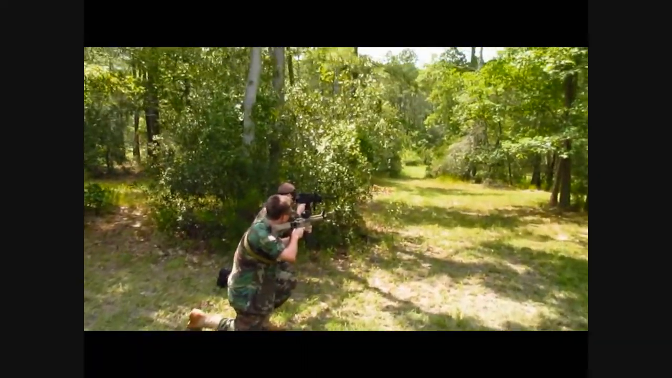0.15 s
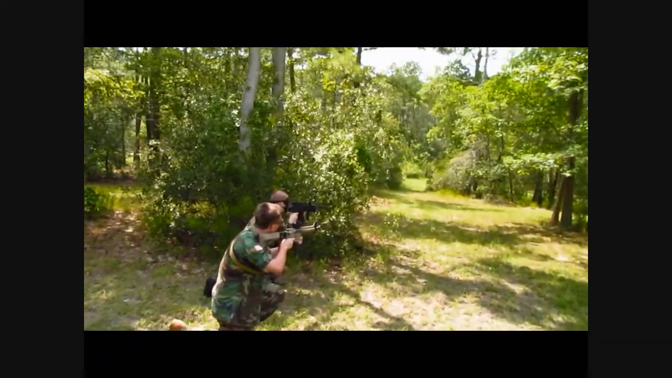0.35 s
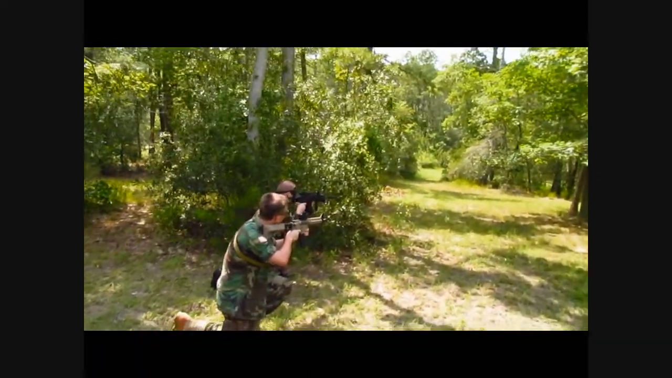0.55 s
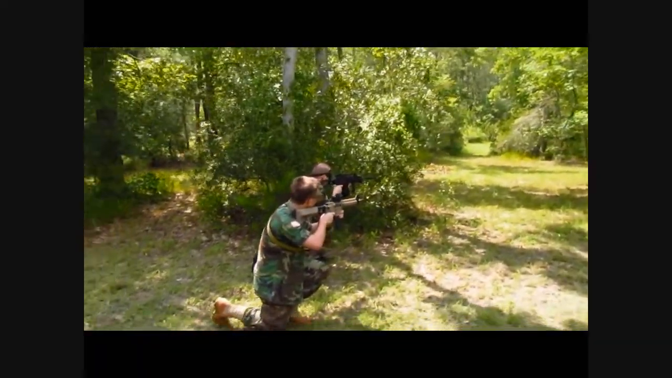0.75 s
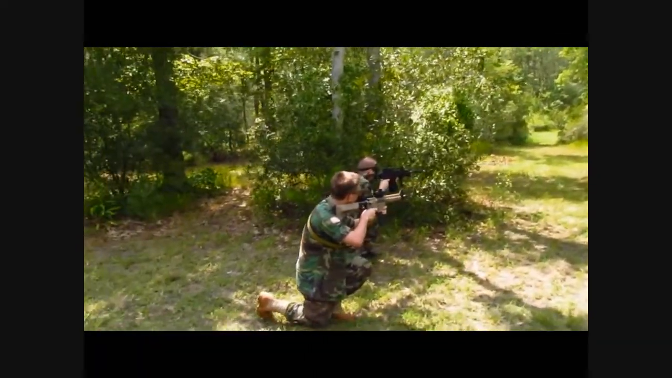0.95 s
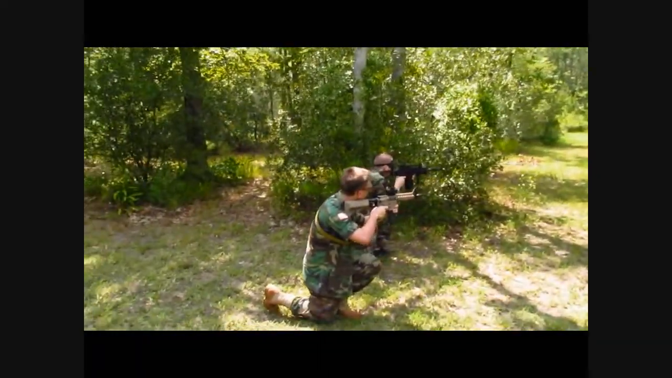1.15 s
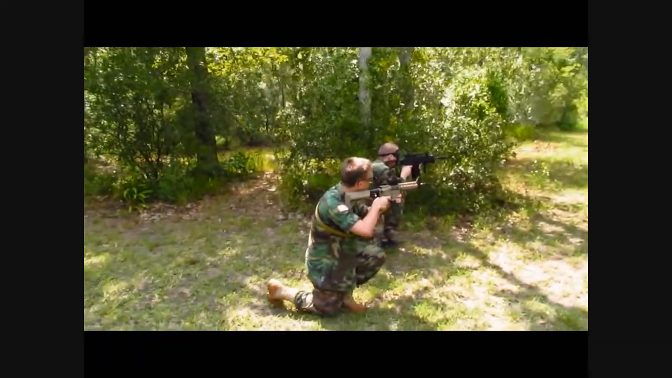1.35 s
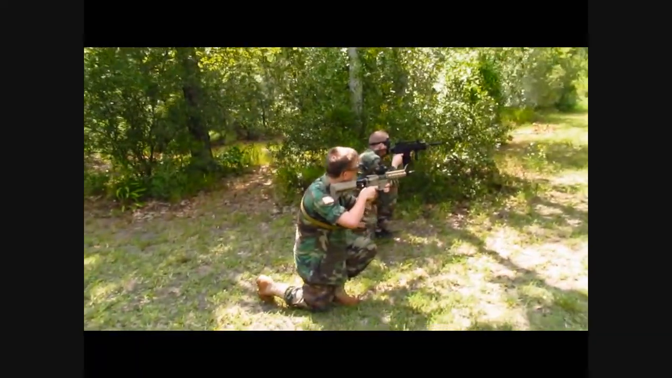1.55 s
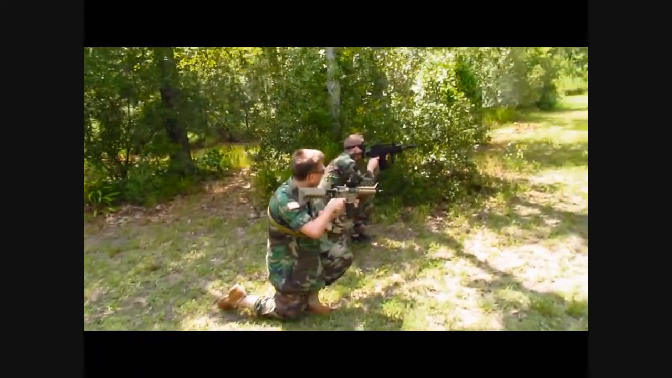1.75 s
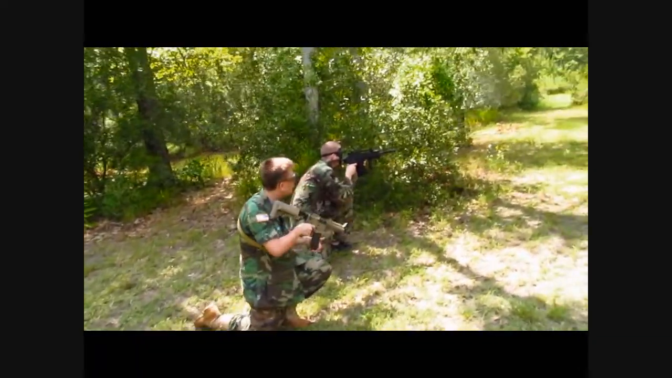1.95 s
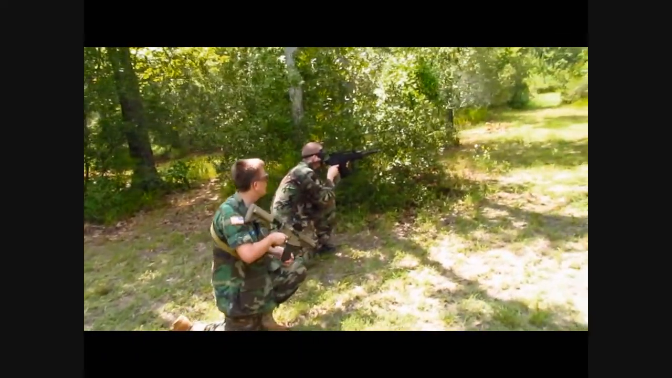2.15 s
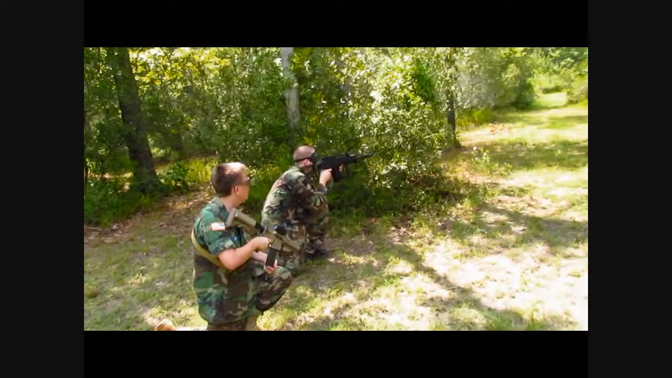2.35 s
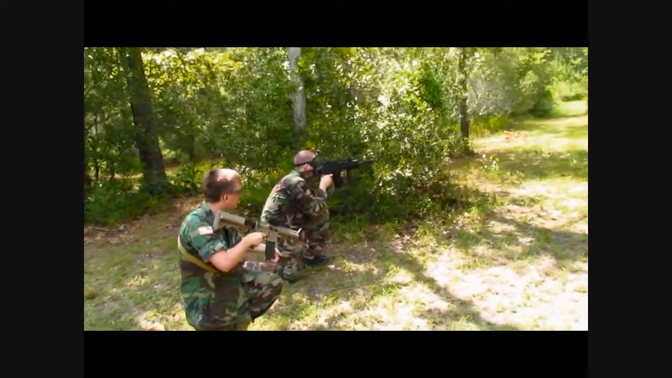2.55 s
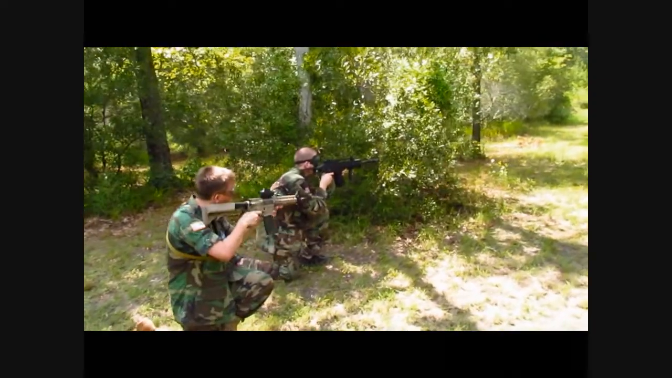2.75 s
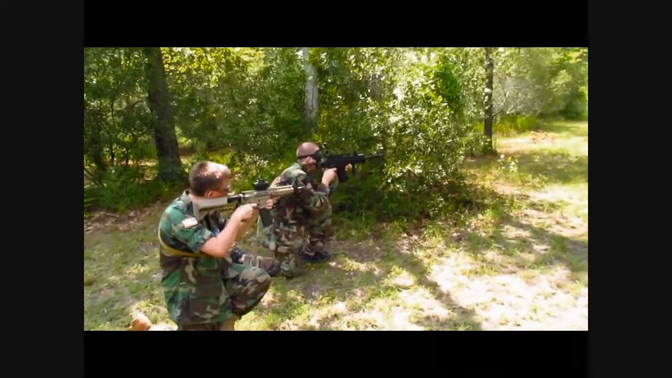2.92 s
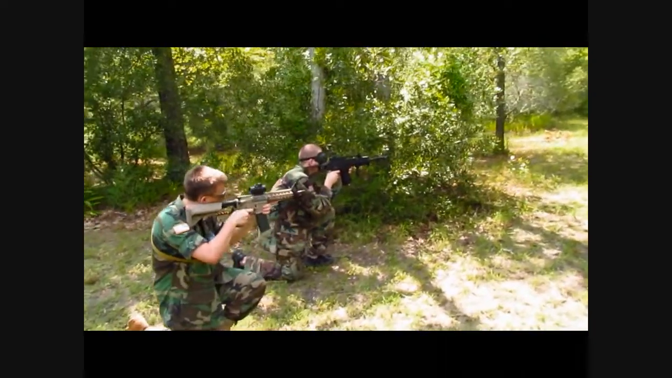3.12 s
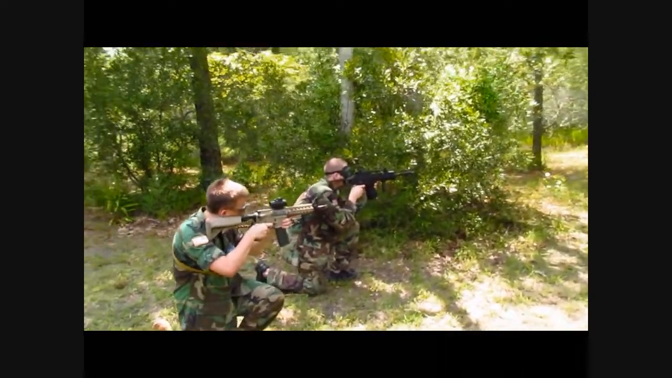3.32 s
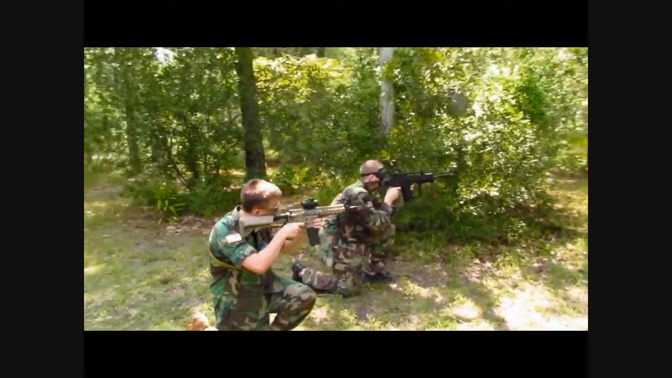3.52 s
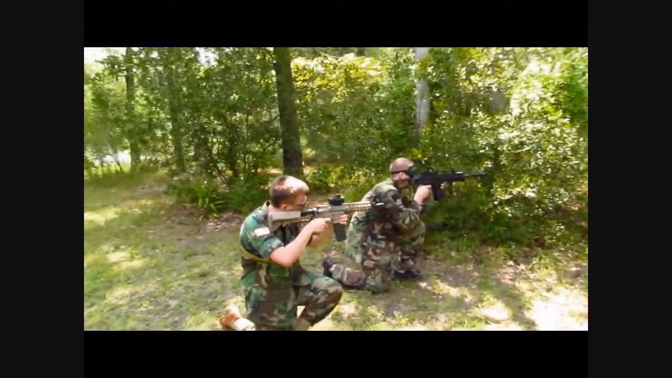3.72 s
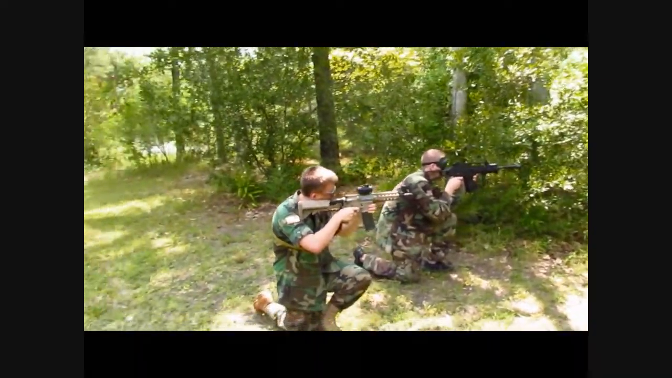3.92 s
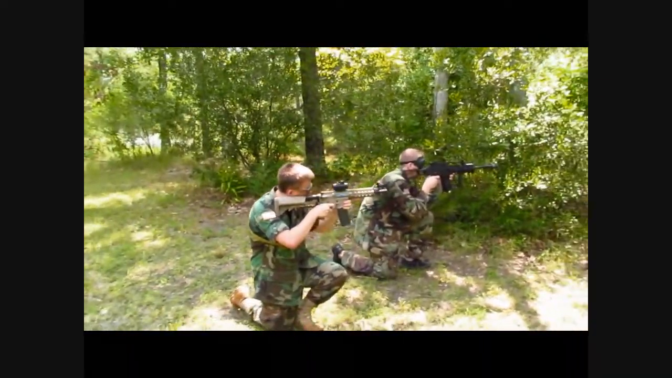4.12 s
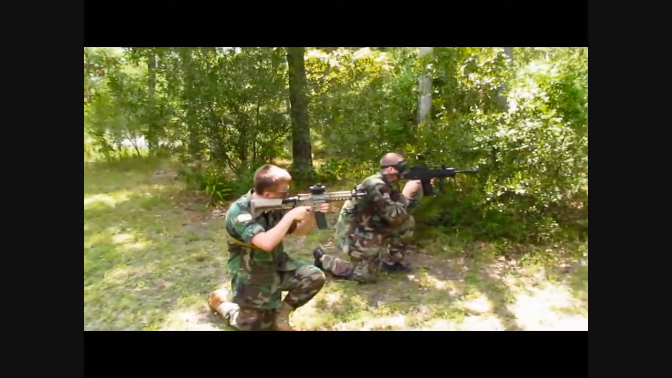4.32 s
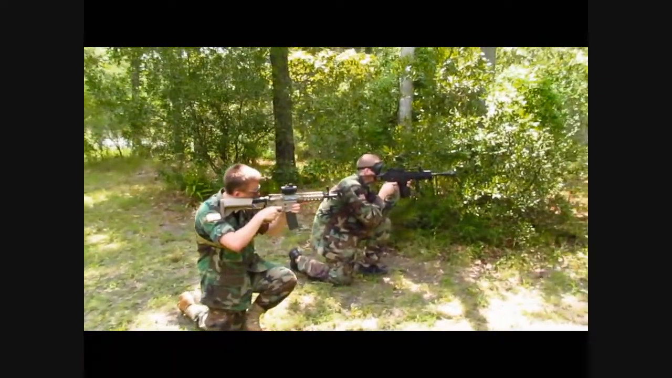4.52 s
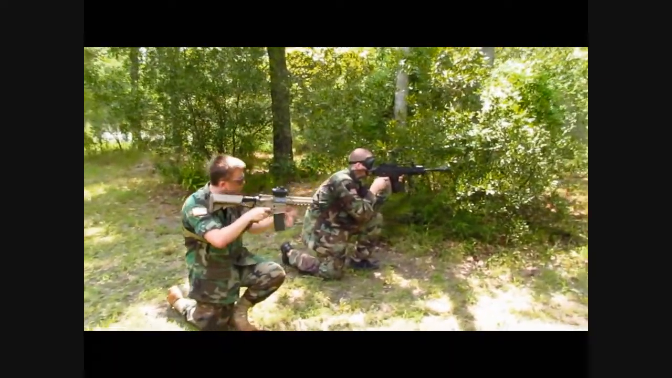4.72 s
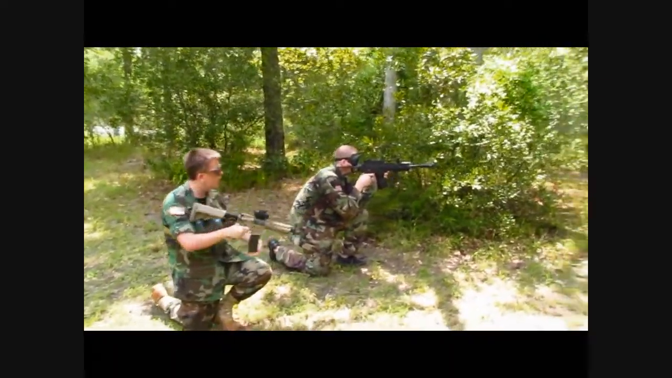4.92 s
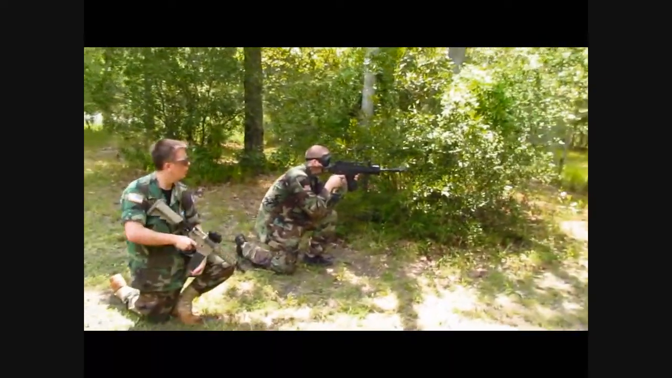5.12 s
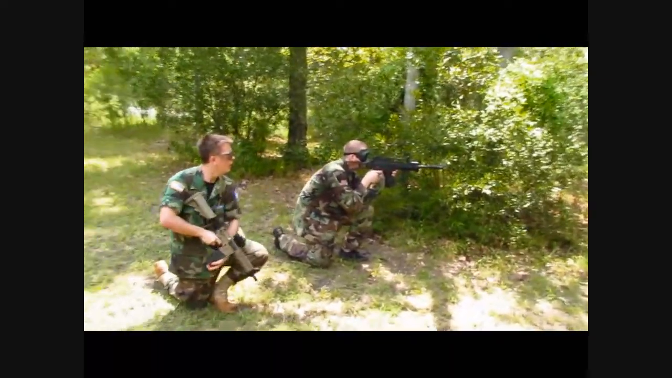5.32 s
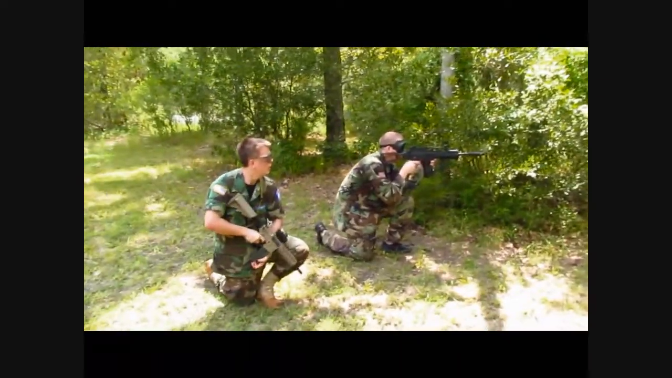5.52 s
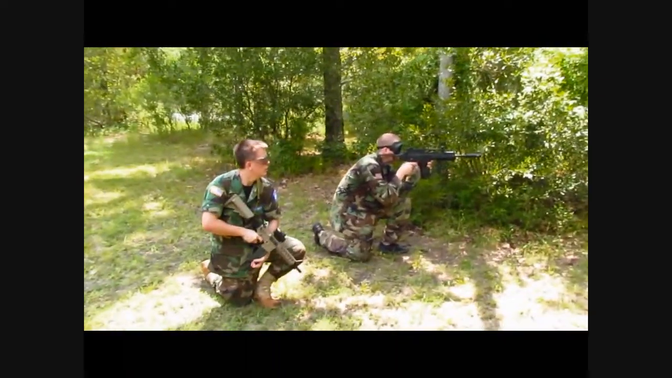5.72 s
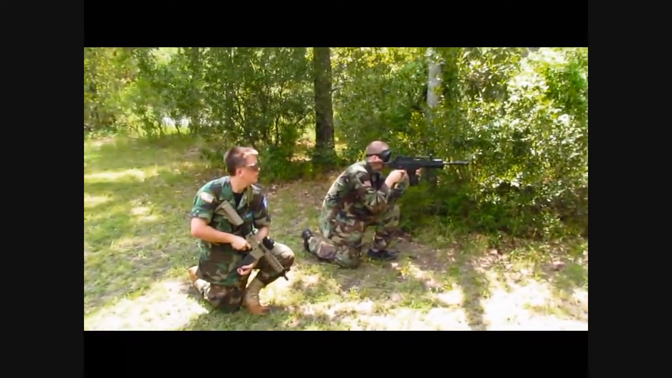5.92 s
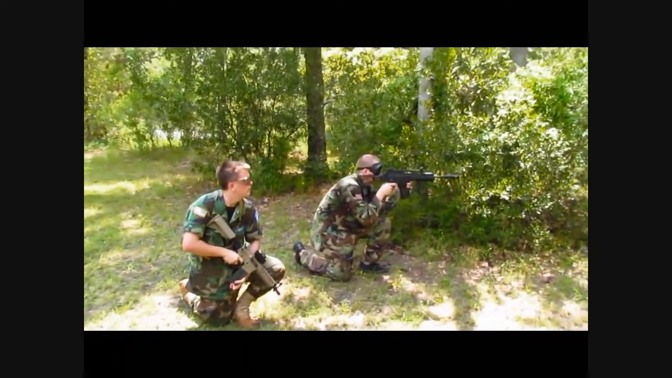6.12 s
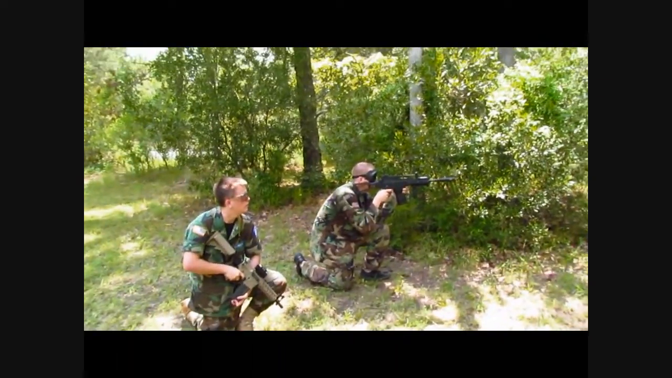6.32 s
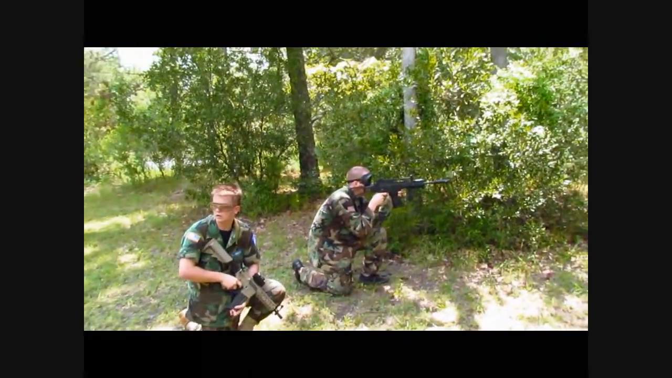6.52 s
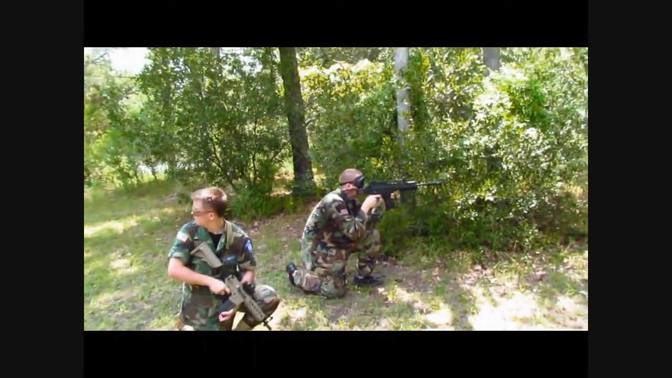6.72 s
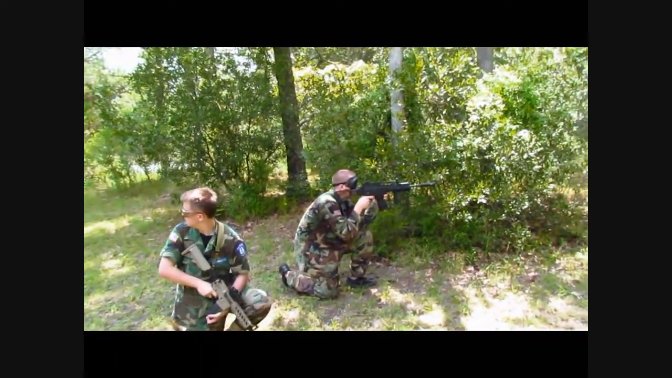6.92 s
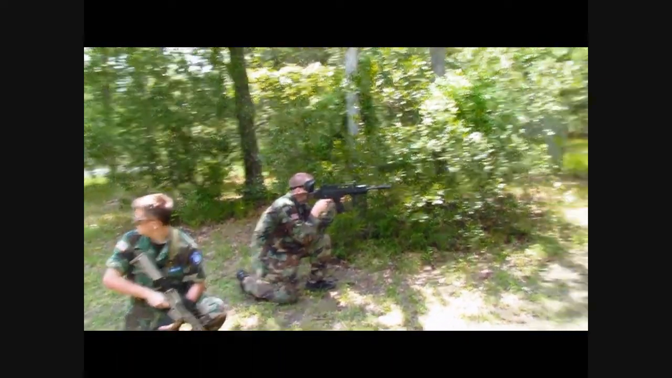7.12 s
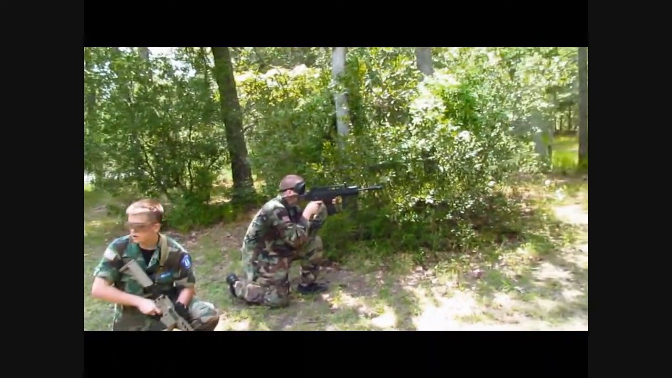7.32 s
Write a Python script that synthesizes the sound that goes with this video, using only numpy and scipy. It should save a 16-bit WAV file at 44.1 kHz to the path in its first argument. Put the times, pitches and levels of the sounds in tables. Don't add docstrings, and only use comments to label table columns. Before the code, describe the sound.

Rapid plasticky clatter of a near airsoft rifle in two bursts, with separate whine-and-slam single shots around it, leaf hiss and small ticks outdoors.

```python
import sys
import numpy as np
from scipy import signal
from scipy.fft import rfft, irfft, next_fast_len
from scipy.io import wavfile
from scipy.ndimage import uniform_filter1d, map_coordinates

SR = 44100
rng = np.random.default_rng(int(sys.argv[2]) if len(sys.argv) > 2 else 0)


def convert_level_to_amplitude(level_db):
    exponent = np.asarray(level_db, float) / 20
    return 10 ** exponent


def waveform_to_disk(signal):
    frames = np.transpose(np.atleast_2d(signal))
    scaled = np.clip(frames, -1, 1) * 32767
    samples = np.round(scaled).astype(np.int16)
    wavfile.write(sys.argv[1], SR, samples)


N = 324645
USUAL_PEAK_DB = -5.5

# multiple of the mesh rate, level_db
SINGLE_TEETH = [(1, -2), (2, 0), (3, -6.5), (4, -7), (5, -10)]
# pitch_hz, density_db [dB per Hz]
SINGLE_GEARBOX = [(120, -42), (200, -14.5), (561, -2.5), (1080, -2), (1600, 3), (1960, -1), (2210, 4),
                  (4640, -1), (8250, -1), (10500, 0.5), (11400, -39), (14800, -46), (22000, -120)]


def unit(x):
    return x / np.sqrt(np.mean(x ** 2) + 1e-20)


def along(points, hz):
    f, v = np.transpose(points)
    return np.interp(np.log(hz + 1), np.log(f + 1), v)


def wobble(rate):
    knots = rng.standard_normal(int(N * rate / SR) + 4)
    return map_coordinates(knots, [np.arange(N) * rate / SR])


def filtered(x, response):
    m = next_fast_len(N + SR // 4)
    return irfft(rfft(x, m) * response(np.fft.rfftfreq(m, 1 / SR)), m)[..., :N]


def hiss(spectrum, patchy_db):
    z = signal.stft(rng.standard_normal(N), nperseg=256)[2]
    field = uniform_filter1d(rng.standard_normal(z.shape), 4, 0)
    field = uniform_filter1d(field, 4, 1)
    patchy = signal.istft(z * convert_level_to_amplitude(patchy_db * unit(field)), nperseg=256)[1][:N]
    return unit(filtered(patchy, lambda hz: convert_level_to_amplitude(along(spectrum, hz))))


def add(track, s, piece):
    i = round(s * SR)
    piece = piece[max(-i, 0):max(N - i, 0)]
    track[max(i, 0):][:len(piece)] += piece


def ring(t, hz, width_hz):
    decay = np.pi * width_hz * t
    return np.sin(2 * np.pi * hz * t) * np.e * decay * np.exp(-decay)


def leaves():
    # pitch_hz, density_db [dB per Hz]
    leaf_colour = [(120, -5), (200, 0.5), (249, -8.5), (687, -3), (1740, -6.5), (2320, -8.5), (7090, -3.5),
                   (10300, -9.5), (11400, -28.5), (14800, -54), (22000, -120)]
    # time_s, level_db
    breeze = [(0, -43), (1.6, -45), (1.85, -54), (2.3, -49.5), (2.6, -50), (3.05, -47.5), (4.6, -49),
              (4.85, -55.5), (5.25, -57.5), (5.8, -57.5), (6.1, -52.5), (6.5, -56), (7, -51.5), (7.36, -50)]
    gust_db = np.interp(np.arange(N) / SR, *np.transpose(breeze))
    return convert_level_to_amplitude(gust_db + wobble(2.45)) * hiss(leaf_colour, patchy_db=2.0)


def far_engine():
    # time_s, fifth_order_hz, level_db
    running = [(0, 114, -55.5), (.4, 117, -59), (.8, 146, -58), (1.901, 134, -67), (2.7, 130, -60),
               (3.3, 134, -62.5), (4.8, 134, -72), (5.9, 132, -68.5), (6.6, 132, -65.5), (7.36, 132, -59.5)]
    # order, level_db
    crank_orders = [(2, -2), (3, -1), (5, 5.5), (8, -4.5)]
    # pitch_hz, density_db [dB per Hz]
    rumble_colour = [(12, -60.5), (20, -26), (102, -4), (134, -5), (161, -7), (206, -17), (500, -21),
                     (650, -61.5), (1100, -120)]
    time = np.arange(N) / SR
    s, fifth_hz, db = np.transpose(running)
    rumble = convert_level_to_amplitude(-2 + 2.7 * wobble(24)) * hiss(rumble_colour, patchy_db=-0.5)
    shaft_hz = np.interp(time, s, fifth_hz) * (1 + 0.017 * wobble(23)) / 5
    turn = 2 * np.pi * np.cumsum(shaft_hz) / SR
    hum = sum(convert_level_to_amplitude(level + 4.2 * wobble(12)) * np.sin(k * turn) for k, level in crank_orders)
    return convert_level_to_amplitude(np.interp(time, s, db)) * (hum + rumble)


def phases(u, rows):
    ramp_db = [-25, 0, 0, -25]
    return np.max([db + np.interp(u, when, ramp_db, left=-90, right=-90) for *when, db in rows], axis=0)


def rifle(shots, mesh, cycle, orders, blows, delays, gears, rattle_db, rattle_s, scatter_db,
          unsteady, crack_db, motor_db, tone_hz, follow):
    out, grind = np.zeros(N), np.zeros(N)
    t = np.arange(SR // 25) / SR
    luck = rng.standard_normal
    at, mesh_at = np.transpose(mesh)
    u = np.arange(at[0], at[-1], 1 / SR)
    mesh_hz = np.interp(u, at, mesh_at)
    motor_hz = tone_hz * (mesh_hz / 1000) ** follow
    gear_shape, whine_shape, motor_shape = [phases(u, rows) for rows in cycle]
    flutter = wobble(300)
    for s, db, thud_db, gear_db, whine_db, over_db, speed in shots:
        start = s + at[0]
        shake = np.roll(flutter, -round(s * SR))[:len(u)]
        shake_back = shake[::-1]

        add(grind, start, convert_level_to_amplitude(2 * (gear_db + gear_shape)))
        rattle = convert_level_to_amplitude(2 * (db + rattle_db - 60 * t / rattle_s))
        add(grind, s - .001, rattle * (1 - np.exp(-t / .003)) ** 2)

        turn = 2 * np.pi * np.cumsum(mesh_hz * speed * (1 + 0.00826 * luck() + unsteady * shake)) / SR
        whine = np.zeros(len(u))
        for m, level in orders:
            order_db = level + min(over_db, 0) * (m > 1) + .7 * luck()
            whine += convert_level_to_amplitude(order_db) * np.sin(m * turn + 9 * luck())
        add(out, start, convert_level_to_amplitude(whine_db + whine_shape + 1.5 * shake_back) * whine)

        spin = 2 * np.pi * np.cumsum(motor_hz * (1 + .012 * luck() + 1.6 * unsteady * shake_back)) / SR
        motor = np.sin(spin) + convert_level_to_amplitude(over_db - 8) * np.sin(2 * spin + luck())
        add(out, start, convert_level_to_amplitude(gear_db + motor_db + motor_shape + 2 * shake + 1.3 * luck()) * motor)

        for (level, hz, width_hz), ms in zip(blows, delays):
            low_db = thud_db * (hz < 1500)
            blow_db = db + crack_db + level + low_db + scatter_db * luck()
            add(out, s + ms / 1000, convert_level_to_amplitude(blow_db) * ring(t, hz * (1 + .018 * luck()), width_hz))
    teeth = convert_level_to_amplitude(2.3 * wobble(500))
    return out + np.sqrt(grind) * unit(teeth * hiss(gears, patchy_db=2.0))


def trigger_pull(shots, gears_db, sag_db, sag_s, whine_db, over_db):
    s, db = np.transpose(shots)
    last = np.arange(len(s)) == len(s) - 1
    gears = gears_db + sag_db * (1 - np.exp(-(s - s[0]) / sag_s))
    whine = gears + whine_db - 21 * last
    thud = -0.5 - 0.63 * (db - USUAL_PEAK_DB)
    return list(zip(s, db, thud, gears - 6 * last, whine, over_db + 0 * s, 1 + 0 * s))


def near_rifle():
    # start_s, peak_db
    first_shots = [(0.0603, -2), (0.1354, -4.5), (0.2103, -6.5), (0.285, -2), (0.3611, -3.5),
                   (0.4372, -3.5), (0.5124, -4.5), (0.5878, -3.5), (0.6631, -3), (0.7384, -4.5),
                   (0.815, -5), (0.8912, -3.5), (0.9674, -3), (1.0436, -2.5), (1.1198, -2.5),
                   (1.1956, -2.5), (1.2713, -1.5), (1.348, -3.5), (1.4245, -3.5), (1.5, -4.5), (1.5766, -2)]
    # start_s, peak_db
    second_shots = [(3.075, 0), (3.1652, 0), (3.2435, -1.5), (3.32, -3.5), (3.3966, -3), (3.4725, -3.5),
                    (3.5488, -5.5), (3.6262, -5), (3.7025, -5), (3.7795, -4.5), (3.8564, -5), (3.933, -5),
                    (4.0097, -7.5), (4.0857, -5.5), (4.1628, -4), (4.2399, -3), (4.3169, -3.5),
                    (4.3948, -4), (4.4712, -4), (4.5489, -2), (4.6291, -2.5)]
    # time_s, mesh_hz
    gear_speed = [(-.012, 1900), (.0195, 2800), (.025, 2750), (.042, 2500), (.066, 2060), (.095, 1900)]
    # start_s, full_s, release_s, end_s, level_db
    gear_cycle = [
        [(-.012, -.001, .05, .2, 0), (.001, .0195, .0195, .05, 4)],
        [(.011, .032, .066, .074, -2)],
        [(.012, .026, .046, .068, 0)],
    ]
    # multiple of the mesh rate, level_db
    tooth_orders = [(1, 0), (2, -5), (3, -18)]
    # level_db, pitch_hz, width_hz
    piston_blows = [(-17, 3000, 550), (-6.5, 3150, 1200), (1.5, 8300, 5500), (-3, 3500, 1600),
                    (-13, 7000, 3000), (-13, 2600, 700), (-13, 9800, 2500), (-18, 1230, 180),
                    (-16, 3400, 700), (-20, 800, 190), (-27, 280, 220), (-26, 640, 250)]
    blow_delays = [-2, .95, 1.15, 3.4, 3.7, 5.4, 8.2, 3, 7, 6.5, 0, 1]
    # pitch_hz, density_db [dB per Hz]
    gearbox = [(120, -31), (200, -11), (611, -7.5), (842, -1), (1070, -4.5), (2210, 2), (2530, -2),
               (2940, 1.5), (9940, 0.5), (10600, 2.5), (11400, -27), (14800, -51), (22000, -120)]
    voice = dict(mesh=gear_speed, cycle=gear_cycle, orders=tooth_orders, blows=piston_blows,
                 delays=blow_delays, gears=gearbox, rattle_db=-15.5, rattle_s=.08, scatter_db=.9,
                 unsteady=0.013, crack_db=-1.5, follow=.45)
    first = trigger_pull(first_shots, gears_db=-27, sag_db=-3.5, sag_s=1.1, whine_db=-6.5, over_db=9)
    first.append((-0.018, -53, 0, -27, -33.5, 9, 1))
    second = trigger_pull(second_shots, gears_db=-27, sag_db=-4.5, sag_s=0.6, whine_db=-2.5, over_db=3)
    return (rifle(first, motor_db=-10.5, tone_hz=575, **voice)
            + rifle(second, motor_db=-13, tone_hz=555, **voice))


def woods(x):
    # pitch_hz, t60_s
    trunk_decay = [(200, 0.034), (2000, 0.4), (10000, 0.36)]
    hz, t, z = signal.stft(rng.standard_normal(SR // 2), SR, nperseg=256)
    fading = z * convert_level_to_amplitude(-60 * t / along(trunk_decay, hz)[:, None])
    tail = signal.istft(fading, SR, nperseg=256)[1]
    late = np.pad(x, (500, 0))
    return signal.fftconvolve(late, tail / np.linalg.norm(tail))[:N]


def second_rifle():
    # start_s, peak_db, gears_db, whine_db, motor speed re usual
    single_shots = [(0.202, -5, -39, -39, 1.03), (0.5226, -6.5, -42, -36, 1.1),
                    (0.7918, -6.5, -35.5, -37, 1), (1.4919, -7, -38, -44, 1.7),
                    (1.7517, -9.5, -39.5, -33.5, 1.07), (2.0632, -6.5, -36, -34, 1.03),
                    (2.397, -3, -35.5, -37.5, 1.01), (3.1037, -9, -33.5, -32.5, 1.05),
                    (4.7332, -12, -48, -42, .97), (4.9888, -9.5, -38.5, -47, 1.25),
                    (5.9036, -6, -37.5, -38.5, .92), (6.2404, -5, -34.5, -37.5, 1.01),
                    (6.6633, -3.5, -32.5, -33.5, .94), (7.1696, -2, -30.5, -33, 0.97)]
    # time_s, mesh_hz
    gear_speed = [(-.105, 500), (-.08, 830), (-.065, 1040), (-.05, 1210), (-.035, 1325), (-.022, 1345),
                  (-.005, 1300), (0.054, 1330), (0.122, 850)]
    # start_s, full_s, release_s, end_s, level_db
    gear_cycle = [
        [(-.105, -.065, .057, 0.075, -0.5), (-.05, .004, .006, .08, 6), (.05, .06, .075, 0.14, -26)],
        [(-.095, -.078, -0.049, -.03, -8.5), (-.07, -.035, -.013, -.006, 2)],
        [(-.097, -.075, -.063, -.03, -7), (-.07, -.05, -.025, -0.021, -21), (.0, .028, .07, .11, -15.5)],
    ]
    # level_db, pitch_hz, width_hz
    piston_blows = [(-18, 2250, 210), (-12, 6800, 1500), (-16, 3470, 400), (-18, 2130, 300),
                    (5.5, 7500, 5600), (-18.5, 1780, 390), (-8, 862, 330), (-15.5, 650, 230),
                    (-29, 140, 110), (-2, 7400, 1300)]
    blow_delays = [-2.5, 1, 1, 1, 1.2, 2.4, -1, -1, -1.5, 4]
    shots = []
    for s, db, gears, whine, speed in single_shots:
        thud = -3 + 0.12 * (db - USUAL_PEAK_DB)
        overtones = -3 - 1.5 * (whine - gears)
        shots.append((s, db, thud, gears, whine, overtones, speed))
    shots.append((3.4, -53, 0, -53, -32.5, 0, 1))
    return rifle(shots, gear_speed, gear_cycle, SINGLE_TEETH, piston_blows, blow_delays, SINGLE_GEARBOX,
                 rattle_db=-10.5, rattle_s=0.053, scatter_db=2.4, unsteady=0.018, crack_db=-4.0,
                 motor_db=-4.5, tone_hz=789, follow=0.156)


def third_rifle():
    # start_s, peak_db, gears_db
    far_shots = [(1.674, -18.5, -44), (1.8977, -19, -44.5), (2.2252, -15, -43.5), (2.4907, -13.5, -40),
                 (2.7295, -13, -40.5), (2.9523, -13.5, -39)]
    # time_s, mesh_hz
    gear_speed = [(-.1, 586), (-.078, 913), (-.04, 1279), (-.01, 1340), (.075, 1220), (.13, 900)]
    # start_s, full_s, release_s, end_s, level_db
    gear_cycle = [
        [(-0.1, -0.076, 0.081, 0.079, -2.4)],
        [(-.11, -.045, -.035, .01, 2)],
        [(-.12, -.045, -.035, .02, -15)],
    ]
    # level_db, pitch_hz, width_hz
    piston_blows = [(-12, 4000, 3500), (-7.5, 4100, 1100), (3.5, 7500, 6200), (0, 7100, 6200),
                    (-13, 4300, 2300), (-26.5, 1500, 610), (-28, 290, 220)]
    blow_delays = [-1, .9, 1.1, 3.1, 3, 0, 0]
    # pitch_hz, density_db [dB per Hz]
    gearbox = [(240, -50), (400, -11), (953, -13), (1320, -3), (2970, -11.5), (3870, -1), (6230, -7.5),
               (10000, -6.5), (11400, -22), (14800, -51), (22000, -120)]
    shots = [(s, db, -1.3, gears, gears - 16, -6, 1) for s, db, gears in far_shots]
    return rifle(shots, gear_speed, gear_cycle, SINGLE_TEETH, piston_blows, blow_delays, gearbox,
                 rattle_db=-10.0, rattle_s=0.061, scatter_db=1.5, unsteady=0.049, crack_db=3.5,
                 motor_db=-17, tone_hz=780, follow=0.24)


def latches():
    # start_s, peak_db
    clacks = [(1.876, -17.5), (2.182, -13.5), (6.028, -13.5), (6.35, -17.5), (6.782, -11.5), (7.29, -10.5)]
    # time_s, mesh_hz
    gear_speed = [(-.03, 600), (.05, 600)]
    # start_s, full_s, release_s, end_s, level_db
    clack_cycle = [
        [(-.006, 0.0027, .008, 0.012, -4), (.005, .016, 0.044, 0.03, -25.5)],
        [(-.03, 0, 0, .03, -40)],
        [(-0.037, -0.0042, -0.0028, 0.011, -2)],
    ]
    # level_db, pitch_hz, width_hz
    latch_blows = [(-13, 3200, 900), (-14, 1700, 800), (-16, 800, 500)]
    blow_delays = [1, 2.5, 1]
    shots = [(s, db, -2, -32.5, -52, -2, 1) for s, db in clacks]
    return rifle(shots, gear_speed, clack_cycle, [], latch_blows, blow_delays, SINGLE_GEARBOX,
                 rattle_db=-14, rattle_s=0.043, scatter_db=1.2, unsteady=0.055, crack_db=-3,
                 motor_db=-10.0, tone_hz=563.4, follow=0)


def taps():
    # start_s, peak_db, centre_hz
    ticks = [(2.647, -45, 4430), (2.855, -19, 2200), (4.876, -40, 1540), (4.905, -25, 3180),
             (5.094, -35, 7290), (5.44, -43, 6230), (5.507, -37, 9550), (5.541, -37, 7140),
             (5.588, -36, 10600), (5.597, -39, 10400), (5.654, -33, 7800), (5.681, -34.5, 10300),
             (5.701, -39, 10200), (5.731, -39, 3820), (5.794, -46, 1990), (5.818, -32, 800),
             (6.14, -36, 748), (6.407, -33, 7040), (6.424, -32, 7300), (6.48, -35, 7360),
             (6.57, -31.5, 842), (7.038, -23.5, 7860), (7.056, -31, 7650), (7.074, -26, 859),
             (7.103, -24, 1597), (7.315, -30, 584), (7.356, -31, 3800)]
    out, t = np.zeros(N), np.arange(SR // 20) / SR
    for s, db, hz in ticks:
        puff = rng.standard_normal(len(t)) * convert_level_to_amplitude(-60 * t / 0.024) * (1 - np.exp(-t / 0.001))
        rung = np.convolve(puff, ring(t[:200], hz, .5 * hz))[:len(t)]
        broad = np.diff(puff, prepend=0) + 0.45 * puff
        broad_db = 7 - 9.5 * (hz < 1800)
        add(out, s, convert_level_to_amplitude(db - 23.5) * (unit(rung) + convert_level_to_amplitude(broad_db) * unit(broad)))
    return out


def scene():
    background = leaves() + far_engine()
    guns = near_rifle() + second_rifle() + third_rifle() + latches()
    return (guns + convert_level_to_amplitude(-12.5) * woods(guns) + taps() + background)[None]


def top_cut(x):
    return signal.sosfilt(signal.butter(12, 11530, fs=SR, output="sos"), x)


def record(dry):
    top_hz = 11124
    x = filtered(dry, lambda hz: 1 / (1 + (hz / top_hz) ** 90))
    mix = x / (1 + np.abs(x / 1.05) ** 6) ** (1 / 6)
    return top_cut(mix)


dry = scene()
out = record(dry)
waveform_to_disk(out)
```